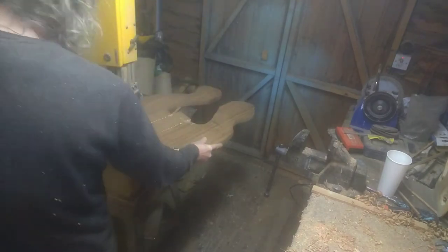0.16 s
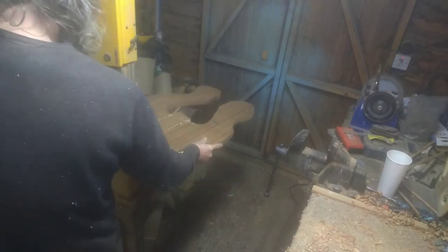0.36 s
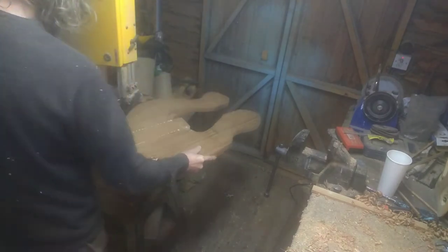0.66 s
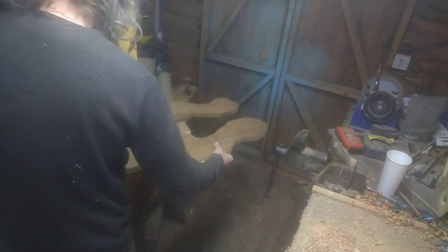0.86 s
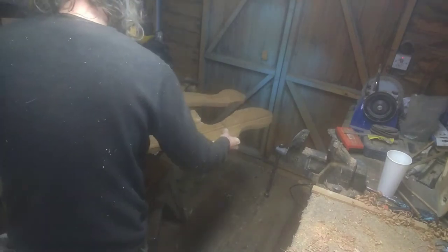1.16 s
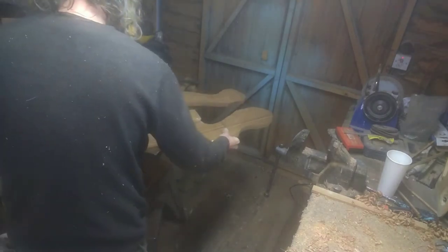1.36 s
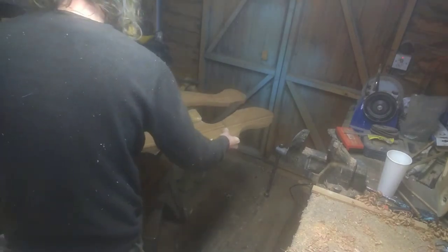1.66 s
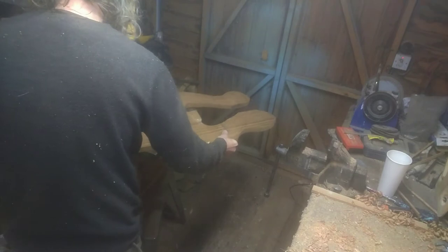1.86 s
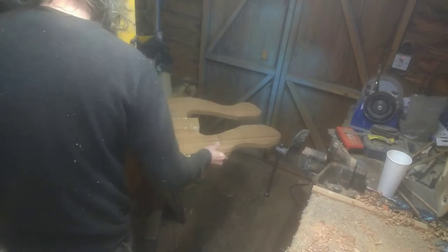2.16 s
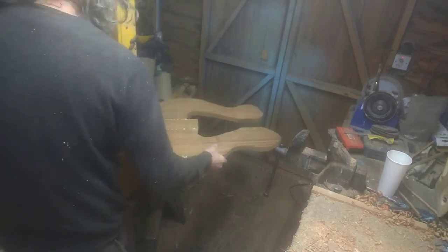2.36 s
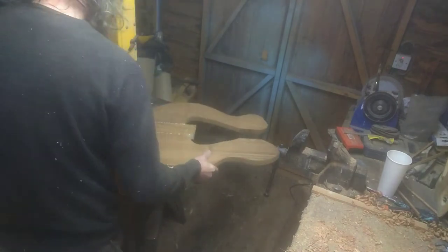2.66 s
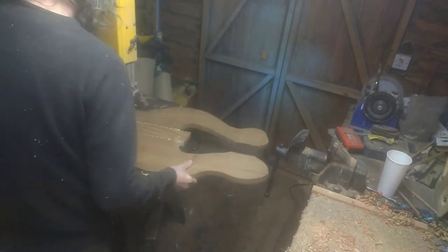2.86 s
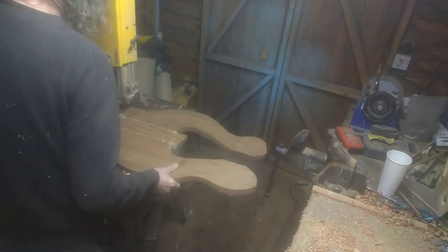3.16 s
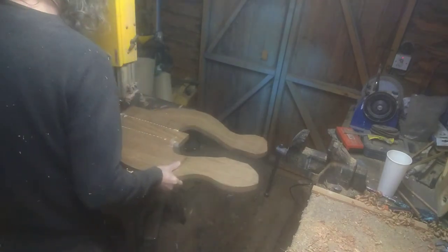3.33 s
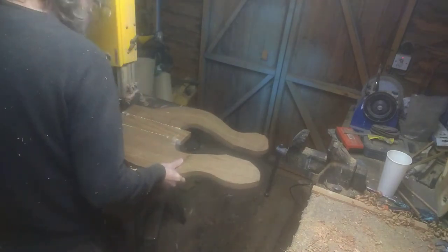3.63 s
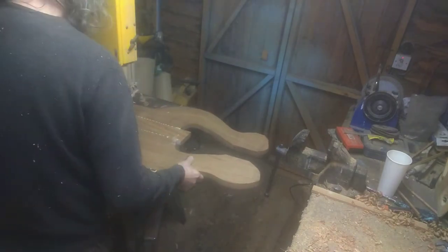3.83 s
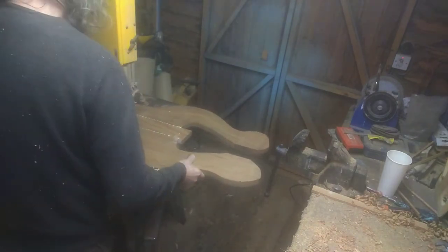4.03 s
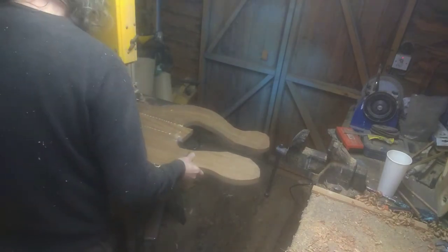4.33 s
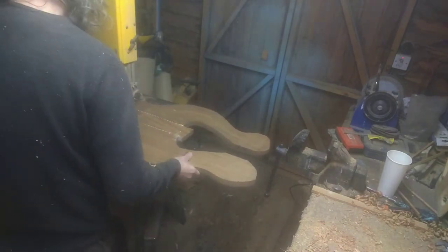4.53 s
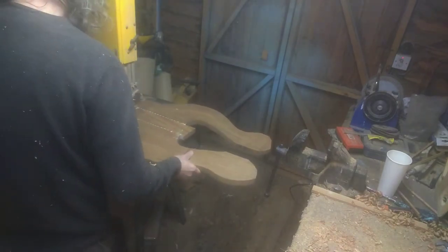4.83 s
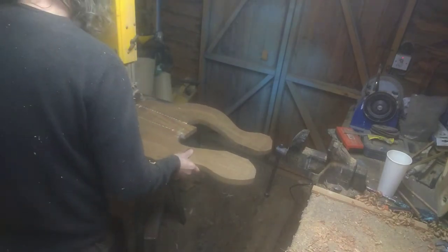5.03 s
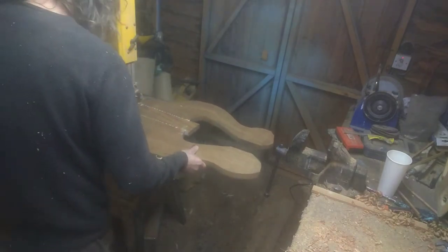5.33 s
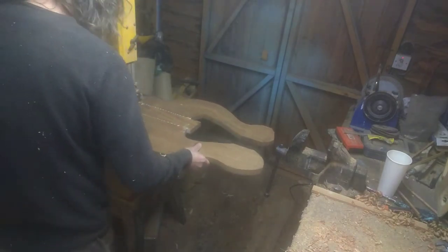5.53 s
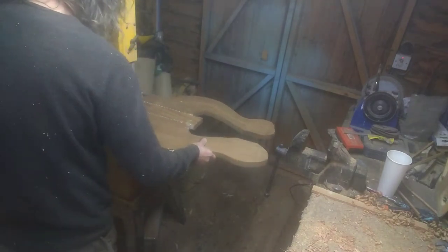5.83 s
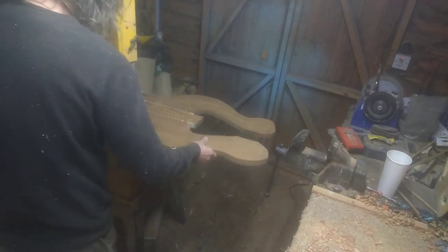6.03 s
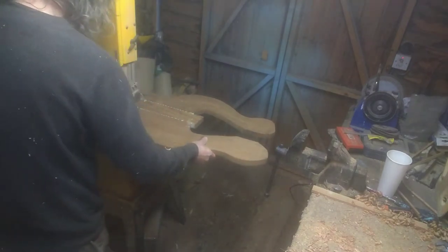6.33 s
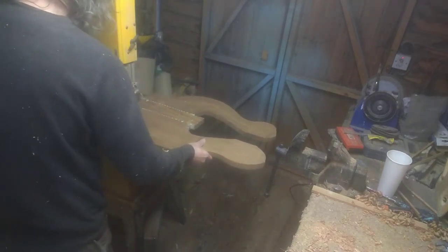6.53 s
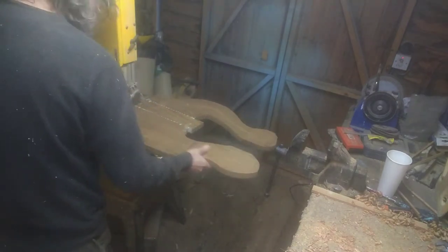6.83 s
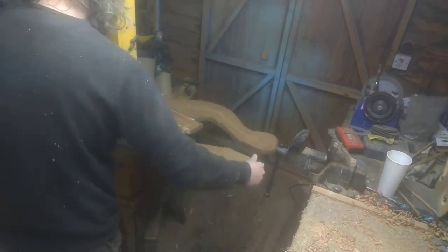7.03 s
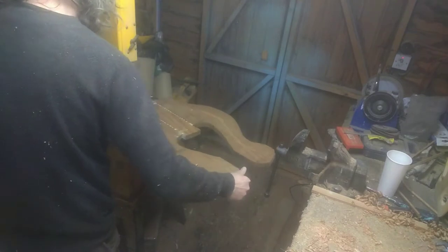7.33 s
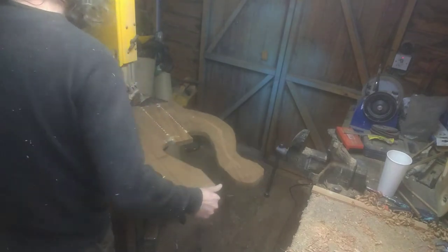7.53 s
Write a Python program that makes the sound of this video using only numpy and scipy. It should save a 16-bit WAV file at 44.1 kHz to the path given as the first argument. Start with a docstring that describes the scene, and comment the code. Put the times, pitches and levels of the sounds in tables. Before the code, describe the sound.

A running bandsaw cuts a thick wooden board in repeated pushes, squealing harshly over hissing chips and a machine rumble.

```python
"""A small shed, where a thick board is pushed into a running bandsaw, eased off and pushed again.
The bed is wheel rumble and motor whine, ducking behind the cut. Teeth sing at their passing rate once
they touch wood, and chips hiss. Under load the blade chatters on a lower squeal that throbs once a wheel
turn, flares on grabs and drops out on slips. The board knocks the table; a low groan passes briefly."""
import sys
import numpy as np
from scipy import signal
from scipy.fft import rfft, irfft
from scipy.io import wavfile
from scipy.ndimage import uniform_filter1d

SR = 44100
rng = np.random.default_rng(int(sys.argv[2]) if len(sys.argv) > 2 else 0)


def log_audio(samples):
    """Write samples as a 16-bit WAV file to the path given in sys.argv[1]."""
    # one column per channel
    frames = np.atleast_2d(samples).T
    # limit to full scale, then quantise
    limited = np.clip(frames, -1, 1)
    pcm = np.round(limited * 32767).astype(np.int16)
    wavfile.write(sys.argv[1], SR, pcm)


N = 339129

# EQ of the wheel and bearing rumble. Each row: frequency in Hz, gain in dB.
RUMBLE_EQ = [(30, -30), (150, -40), (250, -5.5), (600, -12.5), (1000, -6.5), (1550, -3.5), (1950, -15.5),
             (2250, 1.5), (2800, -4), (5000, -7.5), (8000, -12), (15900, -12.5)]
# Resonances of the saw frame. Each row: frequency in Hz, filter width in Hz, gain in dB.
FRAME_MODES = [(385, 300, -10.5), (742.5, 38, 0.5), (834.2, 82, 4.5), (1185, 110, -11), (1721, 170, -3.5),
               (2476, 84, 8), (3296, 530, -12), (4776, 250, -7.5), (6650, 76, -12), (8160, 270, -15),
               (9840, 280, -14)]
# Motor whine, a tone with a sideband each side. Each row: frequency in Hz, relative level in dB.
MOTOR_WHINE = [(3117.5, -4), (3242, 6), (3366, -5)]
# The board hitting the table. Each row: start in seconds, peak in dB.
BOARD_KNOCKS = [(0.545, -12.5), (0.587, -14), (2.525, -18), (2.592, -21)]
# The board's ring. Each row: frequency in Hz, relative level in dB, time to fade 60 dB in seconds.
BOARD_MODES = [(326, -5, 0.12), (563, 11.5, 0.11), (745, 22.5, 0.047), (1120, 29.5, 0.012),
               (1560, 19, 0.042)]
# Faders for teeth touching wood. Each row: time in seconds, then levels in dB of the tooth tone,
# its sixth partial, the rasp between pushes and the fine chip hiss.
TOOTH_FADERS = [(1.28, -40.5, -55, -63, -54), (1.42, -24, -38, -36, -32.5), (1.92, -32.5, -40.5, -36, -25),
                (2.33, -31, -48, -41.5, -33.5), (3.8, -33.5, -45, -43.5, -35), (4.4, -32.5, -34, -40, -33),
                (4.96, -35, -34.5, -42, -32), (5.08, -26, -32.5, -38.5, -34), (5.25, -31.5, -43, -35, -34),
                (5.85, -35, -43, -39.5, -47), (6.62, -35, -45, -43, -32.5), (6.75, -33, -27.5, -48, -31.5),
                (7.05, -32.5, -33, -43, -35.5), (7.38, -32, -42.5, -41.5, -32.5),
                (7.69, -30, -42, -45, -35)]
# Balance of the tooth tone. Each entry: offset in dB, for partials 1 to 5.
TOOTH_PARTIALS_DB = [-13, -9.5, -3.5, -1, -2.5]
# Pitch of the tooth tone. Each row: time in seconds, passing teeth per second.
TOOTH_RATE = [(1.28, 2448), (1.7, 2440), (2.4, 2420), (5, 2430), (6.8, 2412), (7.69, 2425)]
# EQ of the chip hiss. Each row: frequency in Hz, gain in dB.
CHIP_EQ = [(900, -33.5), (1500, -22), (3000, -20), (5200, -16.5), (7000, -8.5), (7800, -15), (9500, -14),
           (12500, -5), (15900, 0)]
# Blade resonances the chips rasp through. Each row: frequency in Hz, filter width in Hz, gain in dB.
BLADE_MODES = [(5520, 97, -14), (6410, 147, -0.5), (8530, 350, 3), (9480, 360, 2.5), (10510, 410, -3),
               (11740, 320, -3), (13850, 850, -4.5), (14130, 660, -8)]
# Pushes of the board. Each row: start, end and release in seconds, chatter pitch in Hz, then in dB
# the throb depth, rasp level, swell over the push and levels of partials 1 to 5.
BOARD_PUSHES = [(1.735, 2.236, 0.054, 2284, 2.05, -38, 1.5, -28, -24.5, -25, -26, -26),
                (2.602, 3.001, 0.019, 2240, 2, -36.5, 1, -26, -23, -17.5, -21.5, -27.5),
                (3.023, 3.634, 0.069, 2239, 1.5, -34, -0.5, -21.5, -22, -15.5, -28, -34),
                (3.889, 4.262, 0.051, 2229, 1, -34, 1, -19.5, -26.5, -18.5, -22.5, -33),
                (4.338, 4.84, .06, 2215, 1.5, -33, -12, -17.5, -19, -17.5, -23, -31.5),
                (5.08, 5.29, .015, 2223, 1.5, -33, -3, -23.5, -30.5, -18.5, -27, -25.5),
                (5.309, 5.844, .012, 2223, 3, -32.5, 0.5, -25, -30, -20.5, -21.5, -26),
                (5.863, 6.07, .05, 2226, 3, -32, -0.5, -22.5, -25, -23.5, -31, -30),
                (6.293, 6.664, 0.035, 2241, 1.5, -37.5, 1.5, -26, -23.5, -26, -22, -24.5),
                (7.132, 7.691, 0.051, 2244, 3, -39.5, 1, -27.5, -21, -20.5, -31, -32)]
# Sudden grabs of the blade in the kerf. Each row: start in seconds, relative strength in dB.
BLADE_GRABS = [(1.723, -8.5), (1.9026, -8), (2.1813, -2), (2.355, -8), (2.4194, -20), (2.5366, 6.5),
               (2.597, -4.5), (2.6628, -24), (2.7057, -6), (2.86, -10), (3.0245, -15), (3.663, -14),
               (3.674, -9), (3.71, -7), (3.8856, -16), (4.3269, -15.5), (5.03, -16), (5.3088, -20),
               (6.0838, -10.5), (6.133, -8), (6.1614, -8.5), (6.258, -12), (6.665, -13), (7.001, -5.5),
               (7.0613, -11), (7.1375, -3.5), (7.1846, -13), (7.2759, -16), (7.317, -15), (7.3517, -24),
               (7.4355, -10), (7.5413, -5), (7.5707, -8), (7.603, -5)]
# Colour of a grab against the steady chatter. Each entry: offset in dB, for partials 1 to 5.
GRAB_PARTIALS_DB = [-7, 1, -3, -9, -1.5]
# Brief slips of the blade. Each row: centre in seconds, depth in dB, width in seconds.
BLADE_SLIPS = [(1.878, -31, 0.016), (2.013, -9, 0.014), (2.149, -9, 0.0097), (2.17, -9, 0.011),
               (2.212, -8.5, 0.0074), (2.568, -20, 0.041), (2.613, -11, 0.01), (2.631, -7, 0.0076),
               (2.655, -22.5, 0.0122), (2.693, -11, 0.02095), (2.848, -10, 0.015), (3.501, -7.5, 0.0096),
               (3.952, -13.5, 0.0121), (4.398, -13.5, 0.009), (5.241, -16, 0.0097), (5.399, -9.5, 0.0082),
               (5.516, -16, 0.0095), (5.541, -11.5, 0.0072), (5.68, -13.5, 0.017), (5.785, -11.5, 0.0089),
               (6.081, -25, 0.0071), (6.125, -13, 0.012), (6.62, -11, 0.012), (6.65, -13.5, 0.013),
               (7.171, -7.5, 0.016), (7.211, -9, 0.013), (7.24, -6, 0.013), (7.269, -8, 0.011),
               (7.309, -10.5, 0.022), (7.345, -8.5, 0.017), (7.456, -9, 0.014), (7.555, -15.5, 0.018),
               (7.597, -11, 0.028)]
# The low groan. Each row: time in seconds, pitch in Hz, level in dB.
GROAN_PATH = [(5.25, 261, -80.5), (5.45, 255, -46), (5.75, 252.8, -46.5), (5.85, 253.7, -81.5)]

WHEEL_HZ = 31.02
PUSH_ATTACK_S, EASED_DB, EASED_RISE = .018, -20, .075  # eased off, chatter is faint and this share higher
SIXTH_DB = -11  # sixth chatter partial against the fifth
GRAB_RISE_S, GRAB_FALL_S = 0.0025, 0.012
GRAB_PULL = 9.5  # how firmly a grab drags the eased pitch back down
TOOTH_UNDER_PUSH_DB = -2.5  # the tooth tone gives way to the chatter
MACHINE_DB, KNEE_DB, DUCK_DB_PER_DB, DUCK_WINDOW_S = -34.5, -28, 0.87, 0.067
SHED_T60_S = .22
MIC_LOW_HZ, MIC_TOP_HZ, MIC_NOISE_DB = 233, 15690, -67


def undb(db):
    """Gain of a level in dB."""
    return 10 ** (np.asarray(db) / 20)


def unit(x):
    """Scaled to rms 1."""
    return x / np.sqrt(np.mean(x ** 2))


def curves(table):
    """One automation curve for each column after the time."""
    times, *columns = np.transpose(table)
    return [np.interp(np.arange(N) / SR, times, column) for column in columns]


def walk(rate):
    """Smooth random drift at rms 1, with `rate` new values a second."""
    hold = max(int(SR / rate), 2)
    steps = np.repeat(rng.standard_normal(N // hold + 1), hold)
    return unit(uniform_filter1d(uniform_filter1d(steps, hold), hold)[:N])


def colour(x, eq):
    """EQ a sound through (Hz, dB) points."""
    hz, db = np.transpose(eq)
    gain_db = np.interp(np.log(np.fft.rfftfreq(N, 1 / SR) + 1), np.log(hz), db)
    return irfft(rfft(x) * undb(gain_db), N)


def band_rms(x, lo_hz, hi_hz):
    """Strength of a sound within one band."""
    bandpass = signal.butter(4, [lo_hz, hi_hz], "bandpass", fs=SR, output="sos")
    return np.std(signal.sosfilt(bandpass, x))


def ring(x, hz, width):
    """One resonance, gain 1 at the centre."""
    return signal.lfilter(*signal.iirpeak(hz, hz / width, fs=SR), x)


def turn(hz, jitter, rate):
    """Phase of a cycle whose speed trembles."""
    return 2 * np.pi * np.cumsum(hz * (1 + jitter * walk(rate))) / SR


def strikes(table):
    """One pulse per row of (seconds, dB)."""
    pulses = np.zeros(N)
    for start, db in table:
        pulses[int(start * SR)] = undb(db)
    return pulses


def stack(phase, gains, flicker_db, rate, grit, grit_rate):
    """Harmonics that each flicker alone; grit widens the higher ones into rough bands."""
    tone = np.zeros(N)
    for k, gain in enumerate(gains, 1):
        flicker = undb(flicker_db * walk(rate)) + grit * k * walk(grit_rate * k ** .5)
        tone += np.sqrt(2) * gain * flicker / np.hypot(1, grit * k) * np.cos(k * phase + k * k)
    return tone


def wheel_rumble():
    """Wheels and bearings rumble through the frame; noise partly repeats each turn, so it hums."""
    lag = int(SR / WHEEL_HZ)
    turns = rng.standard_normal((N // lag + 1, lag))
    drive = unit(signal.lfilter([1], [1, -0.43], turns, axis=0).ravel()[:N])
    pulse_db = 1.64 * np.cos(turn(WHEEL_HZ, jitter=0.026, rate=3.88)) + 0.86 * walk(8.2)
    rumble = colour(drive * undb(pulse_db), RUMBLE_EQ)
    frame = sum(undb(db) * ring(ring(drive, hz, width), hz, width) for hz, width, db in FRAME_MODES)
    body = undb(1) * unit(rumble) + unit(frame)
    return body / band_rms(body, 250, 1000)


def motor_whine():
    """The motor whines on three nearly steady lines."""
    return sum(undb(db + walk(11)) * np.sin(turn(hz, jitter=0.00069, rate=20)) for hz, db in MOTOR_WHINE)


def board_knocks():
    """The board hits the table and gives a short wooden ring."""
    t = np.arange(SR // 5) / SR
    modes = sum(undb(db - 60 * t / t60) * np.sin(2 * np.pi * hz * t) for hz, db, t60 in BOARD_MODES)
    return signal.fftconvolve(strikes(BOARD_KNOCKS), modes / np.abs(modes).max())[:N]


def tooth_tone(phase, level_db, sixth_db, throb):
    """Teeth strike the wood in turn: a gritty note that throbs lightly with the wheel."""
    gains = [undb(level_db + db) for db in TOOTH_PARTIALS_DB] + [undb(sixth_db)]
    return undb(0.57 * throb) * stack(phase, gains, flicker_db=6.1, rate=60, grit=0.51, grit_rate=150)


def chip_hiss(rasp_db, fine_db):
    """Chips hiss through flickering blade resonances; coarse rasp and fine top have their own faders."""
    grain = undb(3.0 * walk(900))
    blade = np.zeros(N)
    for hz, width, db in BLADE_MODES:
        gain = undb(db + 10 + 2 * walk(3.04))
        blade += gain * ring(ring(grain * rng.standard_normal(N), hz, width), hz, 2 * width)
    hiss = colour(grain * rng.standard_normal(N) + blade, CHIP_EQ)
    fine = signal.sosfiltfilt(signal.butter(2, 10000, "highpass", fs=SR, output="sos"), hiss)
    rasp = hiss - fine
    return (undb(rasp_db) * rasp / band_rms(rasp, 5100, 6300)
            + undb(fine_db) * fine / band_rms(fine, 12600, 14300))


def pushes():
    """Feeding the board: how far it is eased off (0-1), the chatter envelope in dB, the push settings."""
    t, rows = np.arange(N) / SR, np.array(BOARD_PUSHES)

    def envelope(start, end, release, swell_db):
        return np.interp(t, [start - PUSH_ATTACK_S, start, end, end + release],
                         [EASED_DB, 0, swell_db, EASED_DB])

    press_db = np.max([envelope(*row) for row in rows[:, [0, 1, 2, 6]]], axis=0)
    eased = np.max([envelope(*row, swell_db=0) for row in rows[:, :3]], axis=0) / EASED_DB
    current = np.minimum(np.searchsorted(rows[:, 1] + rows[:, 2], t), len(rows) - 1)
    return eased, press_db, uniform_filter1d(rows[current, 3:].T, size=300, axis=1)


def blade_chatter(phase, tooth_phase, partial_db, load_db, flare):
    """The loaded blade squeals; passing teeth beat against it and spread sidebands."""
    beat = 1 + 0.13 * np.cos(tooth_phase - phase) + 0.12 * np.cos(2 * (tooth_phase - phase))
    gains = [undb(db) * (undb(load_db) + flare * undb(grab_db))
             for db, grab_db in zip(partial_db, GRAB_PARTIALS_DB)]
    gains.append(undb(SIXTH_DB) * gains[-1])
    return undb(-1) * beat * stack(phase, gains, flicker_db=1.15, rate=80, grit=0.14, grit_rate=200)


def grabs():
    """The blade catches in the kerf: a quick swell, and a pitch scoop that starts sharp and drops."""
    t = np.arange(SR // 8) / SR
    hits = strikes(BLADE_GRABS)
    shape = np.exp(-t / GRAB_FALL_S) - np.exp(-t / GRAB_RISE_S)
    swell = signal.fftconvolve(hits, shape / shape.max())[:N]
    scoop = signal.fftconvolve(hits > 0, np.exp(-t / .012))[:N]
    return np.maximum(swell, 0), .022 * uniform_filter1d(scoop, size=200)


def slips():
    """The blade slips: short bell-shaped dips, in dB."""
    t, db = np.arange(N) / SR, np.zeros(N)
    for centre, depth_db, width in BLADE_SLIPS:
        near = slice(int((centre - .06) * SR), int((centre + .06) * SR))
        db[near] += depth_db * np.exp(-(2 * (t[near] - centre) / width) ** 2)
    return db


def cut():
    """Blade in wood: tooth tone, chip hiss and chatter, all throbbing with the wheel."""
    t = np.arange(N) / SR
    tooth_db, sixth_db, eased_rasp_db, fine_db = curves(TOOTH_FADERS)
    eased, press_db, (push_hz, throb_db, push_rasp_db, _, *partial_db) = pushes()
    throb = np.cos(turn(WHEEL_HZ, jitter=.05, rate=4)) + .4 * walk(30)
    slip_db = slips()
    grip_db = throb_db * throb + slip_db
    grab, scoop = grabs()
    flare = 2.31 * grab * undb(slip_db)
    # a looser grip lets the squeal slide up towards the tooth rate
    slide = EASED_RISE * eased * np.exp(-GRAB_PULL * grab) - .0018 * np.clip(grip_db, -12, 5)
    squeal_hz = push_hz * (1 + scoop + uniform_filter1d(slide, size=100))
    squeal_phase = turn(squeal_hz, jitter=0.00458, rate=200)
    tooth_phase = turn(curves(TOOTH_RATE)[0], jitter=0.00428, rate=150)
    teeth = tooth_tone(tooth_phase, tooth_db + TOOTH_UNDER_PUSH_DB * (1 - eased), sixth_db, throb)
    chatter = blade_chatter(squeal_phase, tooth_phase, partial_db, press_db + grip_db, flare)
    rasp_db = push_rasp_db * (1 - eased) + eased_rasp_db * eased
    hiss = (undb(grip_db) + flare) ** 0.62 * chip_hiss(rasp_db, fine_db)
    touching = np.clip((t - TOOTH_FADERS[0][0]) / 0.039, 0, 1)
    loaded = t > BOARD_PUSHES[0][0] - .1
    return (teeth + hiss) * touching + chatter * loaded


def groan():
    """A rough low tone that fades in and out."""
    hz, db = curves(GROAN_PATH)
    return undb(db + 3 * walk(30)) * np.sin(turn(hz, jitter=.04, rate=40)) * (db > db.min())


def shed(x, wet_db):
    """Dry sound plus the short diffuse tail of a small room."""
    t = np.arange(int(SHED_T60_S * SR)) / SR
    tail = rng.standard_normal(len(t)) * undb(-60 * t / SHED_T60_S)
    return x + undb(wet_db) * signal.fftconvolve(x, tail / np.sqrt(np.sum(tail ** 2)))[:N]


def ducking(cutting):
    """Gain of the machine bed, pulled down as the cut rises above the knee."""
    cut_db = 10 * np.log10(uniform_filter1d(cutting ** 2, int(DUCK_WINDOW_S * SR)) + 1e-9)
    return undb(MACHINE_DB - DUCK_DB_PER_DB * np.maximum(cut_db - KNEE_DB, 0))


def scene():
    """Mono mix: cut and knocks with the shed's tail, over the ducked bed and the groan."""
    cutting = cut()
    foreground = shed(cutting + board_knocks(), wet_db=-6.5)
    bed = ducking(cutting) * (wheel_rumble() + motor_whine())
    return (foreground + bed + groan())[None]


def record(dry):
    """Peaks round off, the small microphone drops the bass and adds faint noise, the top is cut."""
    rounded = np.tanh(0.63 * dry) / 0.61
    thinned = signal.sosfilt(signal.butter(4, MIC_LOW_HZ, "highpass", fs=SR, output="sos"), rounded)
    noise = undb(MIC_NOISE_DB) * unit(signal.lfilter([1], [1, -.97], rng.standard_normal(N)))
    return signal.sosfilt(signal.ellip(12, .2, 75, MIC_TOP_HZ, fs=SR, output="sos"), thinned + noise)


dry = scene()
out = record(dry)
log_audio(out)
```